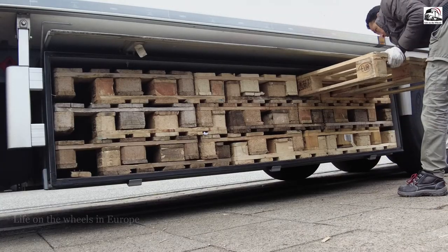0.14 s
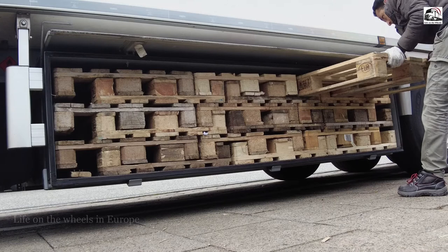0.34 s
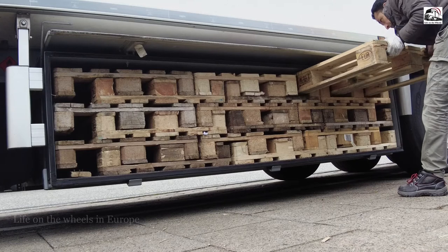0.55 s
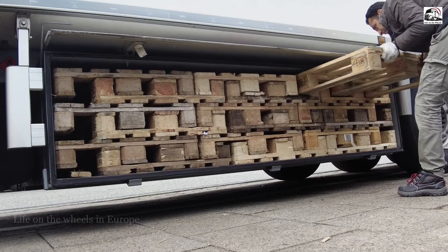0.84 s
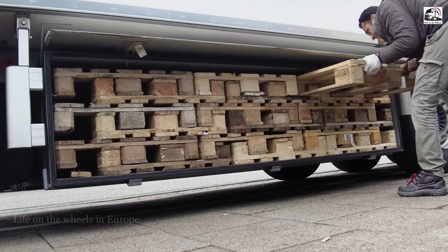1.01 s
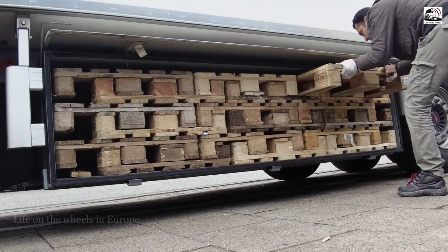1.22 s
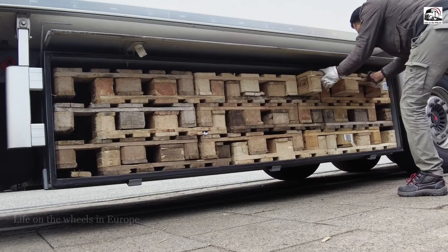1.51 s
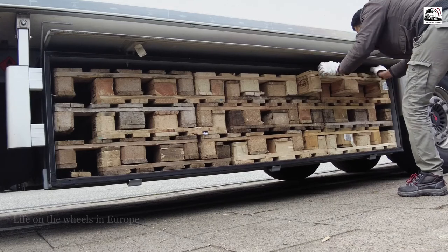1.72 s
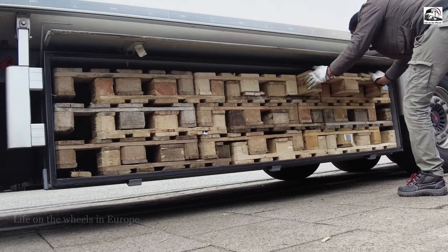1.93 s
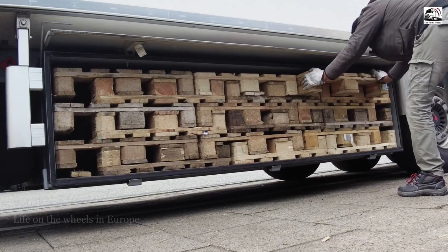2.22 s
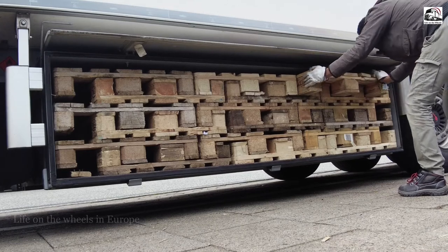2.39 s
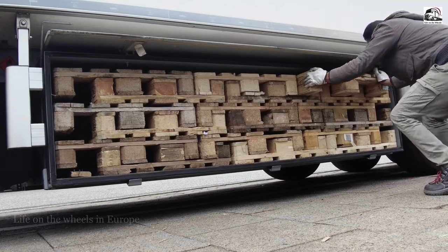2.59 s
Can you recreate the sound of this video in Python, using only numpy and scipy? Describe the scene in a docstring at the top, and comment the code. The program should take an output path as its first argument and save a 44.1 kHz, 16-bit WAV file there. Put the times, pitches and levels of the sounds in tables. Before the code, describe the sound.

Wooden pallet clattering and sliding onto a stack inside a steel box under a truck trailer.

```python
"""A low outdoor rumble and a faint rustle, then wood knocks: a pallet is being shoved into the steel
storage box under a truck trailer, heard from one microphone in the open air by the box.
The pallet knocks against the stack, drops onto it, scrapes inwards and hits the back. Its boards ring
at each blow and catch as they slide; its weight sets the steel panels booming and leaves a wall humming.
Afterwards gloves and clothes rustle and small bits tick."""
import sys
import numpy as np
from scipy import signal
from scipy.io import wavfile

SR = 44100
rng = np.random.default_rng(int(sys.argv[2]) if len(sys.argv) > 2 else 0)


def wrap_up_sound(samples):
    """Save the sound to the file named by the first command line argument, as 16-bit audio."""
    columns = np.atleast_2d(samples).T
    # keep every value between -1 and 1, then stretch to whole-number steps
    tamed = np.clip(columns, -1, 1)
    steps = np.round(tamed * 32767).astype(np.int16)
    wavfile.write(sys.argv[1], SR, steps)


N = 121275
TIME = np.arange(N) / SR
RING_TIME = TIME[:SR // 2]


def from_db(db):
    """Decibels to gain."""
    return 10 ** (np.asarray(db) / 20)


def rms_one(x):
    """Scale to rms 1."""
    return x / np.sqrt(np.mean(x ** 2) + 1e-20)


def at_hz(points, hz):
    """Read a table on a log-frequency axis."""
    frequencies, values = np.transpose(points)
    return np.interp(np.log(hz), np.log(frequencies), values)


def level(curve):
    """Gain over time from (time [s], level [dB]) points."""
    return from_db(np.interp(TIME, *np.transpose(curve)))


def cut(x, hz, kind, order=2):
    """Butterworth filter."""
    return signal.sosfilt(signal.butter(order, np.clip(hz, 10, .45 * SR), kind, fs=SR, output="sos"), x)


def dying(t, t60):
    """Exponential decay, 60 dB down after t60 seconds."""
    return np.exp(-np.log(1000) * t / t60)


def ring(hz, t60, t=RING_TIME):
    """One struck mode: a decaying sine."""
    return np.sin(2 * np.pi * hz * t) * dying(t, t60)


def ring_together(modes, t=RING_TIME):
    """The sum of a body's modes, all struck at once."""
    return sum(from_db(db) * ring(hz, t60, t) for hz, db, t60 in modes)


def add(out, start_s, sound):
    """Mix a sound in at its start time."""
    i = max(int(start_s * SR), 0)
    out[i:i + len(sound)] += sound[:max(N - i, 0)]


def bands(sources, spectrum):
    """Half-octave (centre [Hz], signal) pairs from two white sources in turn, keeping their power."""
    edges = 18 * 2 ** np.arange(0, 10.1, .5)
    centres = np.sqrt(edges[1:] * edges[:-1])
    gains = from_db(at_hz(spectrum, centres))
    gains /= np.sqrt(np.sum(gains ** 2 * np.diff(edges)) * 2 / SR)
    return [(hz, gains[k] * cut(sources[k % 2], edges[k:k + 2], "band")) for k, hz in enumerate(centres)]


def noise(spectrum):
    """Coloured noise, rms 1."""
    return rms_one(sum(band for _, band in bands(rng.standard_normal((2, N)), spectrum)))


# open air around the microphone: (frequency [Hz], relative level [dB])
AIR_COLOUR = [(20, 3), (35, 6.5), (62, -3), (90, -9), (150, -25), (300, -30), (700, -34.5), (1600, -42),
              (3000, -54), (6000, -62.5), (10000, -70.5), (15000, -73)]

def outdoor_rumble(level_db=-29):
    """The steady low background of the place."""
    return from_db(level_db) * noise(AIR_COLOUR)


# the worker's movements at the box: (time [s], length [s], level [dB])
CLOTH_RUBS = [(0, 0.3, -57.5), (0.761, 0.068, -44), (1.163, 0.077, -45), (2.069, 0.21, -46),
              (2.403, 0.3, -50.5), (2.61, 0.18, -49.5)]
# rubbing fabric: (frequency [Hz], relative level [dB])
CLOTH_COLOUR = [(300, 9.5), (1000, 8), (3000, 2.5), (4200, -3.5), (6000, -5), (8500, -19.5), (15000, -18)]

def rustle():
    """Gloves and clothes rub in soft swells of noise."""
    swells = np.zeros(N)
    for start_s, length_s, db in CLOTH_RUBS:
        add(swells, start_s, from_db(db) * np.hanning(int(length_s * SR)))
    return swells * noise(CLOTH_COLOUR)


def grip(spread_db=2.0, step_s=.02):
    """Uneven grip of sliding wood: a gain that glides between random values."""
    moments = np.arange(0, N / SR + step_s, step_s)
    return np.interp(TIME, moments, from_db(spread_db * rng.standard_normal(len(moments))))


# friction of the pallet on its way into the box: (time [s], level [dB])
FRICTION = [(0, -51), (.25, -57.5), (.37, -36.5), (.46, -62), (.76, -69), (.83, -35), (.93, -38),
            (1.1, -41), (1.26, -32.5), (1.42, -37), (1.5, -37.5), (1.61, -28.5), (1.69, -38), (1.73, -39.5),
            (1.765, -64), (2.0, -80)]
# wood dragged over wood: (frequency [Hz], relative level [dB])
SCRAPE_COLOUR = [(100, 1.5), (230, 3), (450, 4), (800, 1), (1500, -9), (2800, -17.5), (4000, -29),
                 (10000, -51)]

def scrape(slips_per_s=1600, spread_db=1.5):
    """Rough boards catch and slip many times a second, each slip a tiny click in the wood."""
    sizes = from_db(spread_db * np.minimum(rng.exponential(1, (2, N)), 4))
    signs = rng.choice([-1, 1], (2, N))
    slips = sizes * signs * (rng.random((2, N)) < slips_per_s / SR)
    grinding = sum(band * grip() for _, band in bands(slips + 1e-18, SCRAPE_COLOUR))
    return level(FRICTION) * rms_one(grinding)


# the boards, rung by catches and knocks: (frequency [Hz], relative level [dB], t60 [s])
BOARD_MODES = [(227, 1, 0.26), (354.3, 0, 0.11), (397, -3.5, 0.078), (580, 1, 0.06), (682.3, 0.5, 0.08),
               (788, -7.5, 0.094), (889, -4, 0.042), (1051, -2.5, 0.065), (1204, -2.5, 0.051),
               (1357, -3, 0.053), (1670, -5, 0.042), (1968, -12, 0.049), (2415, -3, 0.04),
               (2790, -2, 0.054)]

def catches(per_s=110, spread_db=3.5, ring_time_share=.46, against_friction_db=-3.5):
    """Rough spots snag at random; each briefly rings the loaded boards with a new mix of modes."""
    out = np.zeros(N)
    starts = np.flatnonzero(rng.random(N) < per_s / SR)
    sizes = from_db(spread_db * np.minimum(rng.exponential(1, len(starts)), 3))
    modes = np.array([from_db(db) * ring(hz, t60 * ring_time_share) for hz, db, t60 in BOARD_MODES])
    for start, size in zip(starts, sizes):
        mix = rng.standard_normal(len(modes))
        add(out, start / SR, size * (mix @ modes))
    return from_db(against_friction_db) * level(FRICTION) * rms_one(cut(out, 1500, "low", order=1))


# the box shaking under the trailer: (time [s], level [dB])
SHUDDER_LEVEL = [(0, -42.5), (.18, -38.5), (.26, -23), (.45, -26.5), (.6, -26.5), (.74, -25), (.8, -31),
                 (.9, -13), (1.1, -21), (1.3, -16.5), (1.53, -25.5), (1.72, -19.5), (1.84, -23.5),
                 (1.96, -33), (2.3, -47.5), (2.75, -38.5)]
# its deep rumble: (frequency [Hz], relative level [dB])
SHUDDER_SPECTRUM = [(20, 0), (32, 3.5), (60, 1.5), (90, -2.5), (120, -6.5), (170, -11.5), (230, -13.5),
                    (400, -31), (800, -70), (3000, -80), (12000, -95)]

def box_shudder():
    """The moving load keeps the steel panels shuddering."""
    return level(SHUDDER_LEVEL) * noise(SHUDDER_SPECTRUM)


# small bits ticking at the box: (time [s], level [dB], t60 [s])
DRY_TICKS = [(0.08, -52, 0.081), (0.437, -53, 0.05), (0.554, -47.5, 0.13), (1.724, -42, 0.047),
             (1.813, -42.5, 0.011), (2.04, -46, .05), (2.385, -38, 0.066), (2.537, -39, .1),
             (2.555, -39, .04), (2.609, -40.5, 0.058), (2.622, -41.5, 0.053), (2.72, -37, 0.047),
             (2.737, -45, 0.06)]
# their dry tone: (frequency [Hz], relative level [dB])
TICK_SPECTRUM = [(300, 7), (1200, 4.5), (2800, 3.5), (4200, -5), (6000, -2.5), (9000, -14), (15000, -12)]

def ticks():
    """Small bits tick, each a sudden burst of noise that dies fast."""
    bursts = np.zeros(N)
    for start_s, db, t60 in DRY_TICKS:
        add(bursts, start_s, from_db(db) * dying(RING_TIME, t60))
    return bursts * noise(TICK_SPECTRUM)


# dense ring of the whole pallet: (frequency [Hz], relative level [dB])
PALLET_COLOUR = [(100, 9), (250, 13), (700, 4.5), (1300, 0.5), (2000, 0), (2800, -5), (3700, -6.5),
                 (7000, -11.5), (15000, -36)]
# its decay in the wood: (frequency [Hz], t60 [s])
PALLET_DECAY = [(150, 0.16), (700, 0.068), (2500, 0.058), (10000, 0.065)]
# its tail inside the box: (frequency [Hz], t60 [s])
BOX_DECAY = [(150, 1), (700, 0.32), (2500, 0.14), (10000, .1)]
# wood striking wood: (time [s], level [dB], contact brightness [Hz], low cut [Hz],
# crack level [dB], crack t60 [s], block pitch [Hz], block level [dB])
BLOWS = [(.196, -31.5, 1740, 453, -38, 0.021, 1240, -22.5), (.284, -34, 880, 390, -72, .03, 900, -30),
         (.301, -32.5, 695, 300, -69, .03, 547, -34), (.316, -32, 1070, 170, -57, 0.037, 1090, -38),
         (.339, -26, 2730, 1010, -50.5, .04, 1460, -18), (.347, -28, 2480, 250, -53, 0.063, 2000, -39),
         (.5855, -21, 1120, 350, -36.5, 0.022, 980, -13), (.623, -43.5, 2520, 500, -62, .03, 1100, -42),
         (.659, -30, 590, 246, -60, .03, 550, -32), (.744, -45, 3040, 695, -52, .02, 2600, -44),
         (.810, -26, 1500, 500, -56, .02, 1360, -20), (.8255, -20.5, 1390, 298, -56, .02, 990, -20),
         (.843, -21.5, 1520, 402, -46, .04, 1210, -25), (.8615, -13, 2800, 870, -35, .035, 1860, -5),
         (.867, -23, 2600, 794, -39, 0.045, 970, -10), (.874, -14, 2330, 580, -38, 0.033, 1310, -8.5),
         (.885, -17.5, 1680, 300, -48, .03, 410, -21), (.897, -29.5, 2190, 400, -61, .03, 700, -24),
         (.925, -25, 885, 200, -66, .03, 480, -20), (.980, -16, 1720, 249, -39, 0.029, 2870, -14),
         (.982, -26.5, 900, 300, -52, .02, 935, -6.5), (.987, -23.5, 1200, 200, -49, .025, 600, -19),
         (1.147, -19.5, 890, 430, -46.5, 0.058, 740, -9.5), (1.226, -19.5, 1280, 350, -46.5, .05, 700, -18),
         (1.231, -30.5, 1990, 402, -49, .04, 1130, -22), (1.243, -25, 1000, 353, -52, .03, 840, -25),
         (1.368, -22.5, 1370, 454, -43.5, .03, 700, -11), (1.376, -30, 1800, 400, -48, 0.043, 810, -28),
         (1.541, -37, 1000, 300, -58, .03, 600, -32), (1.562, -37, 2000, 400, -46, .04, 1000, -34),
         (1.601, -20.5, 1300, 297, -38.5, .06, 483, -18), (1.634, -21.5, 1490, 352, -44, .05, 473, -13.5),
         (1.638, -28, 1780, 404, -50, .03, 1840, -11), (1.642, -25.5, 1210, 298, -50, .03, 1060, -18),
         (1.655, -24.5, 653, 200, -69, .03, 620, -17.5), (2.042, -39, 2000, 1010, -62, 0.033, 1140, -34)]

def knocks(dense_db=.5, tail_db=-23, boards_db=-10.5, strike_spread_db=3.5, block_t60_cycles=15):
    """Each blow rings the struck block, boards and whole pallet, with a crack and a tail in the box."""
    t, out = RING_TIME, np.zeros(N)
    modes = np.array([(-1) ** k * from_db(db) * ring(hz, t60)
                      for k, (hz, db, t60) in enumerate(BOARD_MODES)])
    for start_s, db, contact_hz, low_hz, crack_db, crack_t60, block_hz, block_db in BLOWS:
        dense = np.zeros(len(t))
        for hz, band in bands(rng.standard_normal((2, len(t))), PALLET_COLOUR):
            box_tail = from_db(tail_db) * dying(t, at_hz(BOX_DECAY, hz))
            dense += band * (dying(t, at_hz(PALLET_DECAY, hz)) + box_tail)
        boards = from_db(boards_db + strike_spread_db * rng.standard_normal(len(modes))) @ modes
        wood = cut(from_db(dense_db) * dense + boards, contact_hz, "low")
        wood = cut(wood, low_hz, "high")
        wood /= np.sqrt(np.mean(wood[:SR // 125] ** 2))  # rms 1 over the first 8 ms
        treble = cut(rng.standard_normal(len(t)), 2850, "high")
        crack = rms_one(cut(treble, 5500, "low", order=1)) * dying(t, crack_t60)
        block = cut(ring(block_hz, block_t60_cycles / block_hz), 2 * block_hz, "low")
        add(out, start_s, from_db(db) * wood + from_db(crack_db) * crack + from_db(block_db) * block)
    return out


# the fuller blows: (time [s], level [dB])
DECK_FLEXES = [(.196, -33), (0.5856, -24.5), (0.658, -27.5), (.826, -24.5), (.878, -16), (.91, -20),
               (.981, -16), (1.147, -25), (1.228, -26), (1.368, -26.5), (1.603, -23), (1.645, -26)]
# the pallet's deck: (frequency [Hz], relative level [dB], t60 [s])
DECK_MODES = [(199.6, 0, 0.16), (229, -3.5, 0.19), (259.6, -2.5, 0.17), (356, -6, 0.082), (448, -11, 0.13)]

def deck():
    """Full blows flex the whole deck, which answers with a hollow note."""
    out = np.zeros(N)
    note = cut(ring_together(DECK_MODES), 590, "low")
    for start_s, db in DECK_FLEXES:
        add(out, start_s, from_db(db) * note)
    return out


# weight landing on the box: (time [s], impulse level [dB], push length [s])
PUSHES = [(0.213, -15, 0.026), (0.259, -16, 0.021), (0.317, -22.5, 0.0052), (0.377, -28, 0.0072),
          (0.592, -26.5, 0.0061), (.655, -23.5, 0.008), (0.881, -9, 0.0093), (.906, -12.5, 0.007),
          (0.981, -18.5, 0.007), (1.147, -19, 0.0076), (1.2, -8, 0.018), (1.255, -30, 0.0063),
          (1.401, -17.5, 0.011), (1.608, -9, 0.0088), (1.64, -12.5, 0.0094), (1.679, -8.5, 0.0096),
          (2.434, -22, 0.014)]
# steel floor and walls: (frequency [Hz], relative level [dB], t60 [s])
PANEL_MODES = [(30.5, -5, 0.52), (42.5, 2.5, 0.31), (59.02, -2, 0.57), (87, -14, .25), (114.2, -5, 0.61),
               (155.4, -19, 0.69), (203.4, -3, 0.45)]

def box_boom():
    """Soft pushes set the steel panels booming; a longer push gives a duller boom."""
    force = np.zeros(N)
    for start_s, db, length_s in PUSHES:
        push = np.hanning(int(length_s * SR))
        add(force, start_s, from_db(db) * push / push.sum())
    return signal.fftconvolve(force, ring_together(PANEL_MODES, TIME[:SR]))[:N]


# fine hiss of the slide towards the back of the box: (time [s], level [dB])
HISS_LEVEL = [(.76, -70), (.785, -52.5), (.87, -53), (.91, -76), (.98, -61), (1.04, -56), (1.12, -57.5),
              (1.22, -51.5), (1.3, -56), (1.61, -49.5), (1.67, -56), (1.73, -53.5), (1.765, -85)]
# its bright tone: (frequency [Hz], relative level [dB])
HISS_SPECTRUM = [(500, -7), (1500, 0), (2800, 2), (4000, -1.5), (7000, -2), (9000, -15.5), (15000, -15)]

def splinter_hiss(tears_per_s=130, tear_size=1.2, tear_t60_s=.014):
    """Sliding wood hisses, flaring for milliseconds each time fibres tear."""
    tears = (rng.random(N) < tears_per_s / SR) * np.minimum(rng.exponential(1, N), 3)
    flares = signal.fftconvolve(tears, dying(RING_TIME, tear_t60_s))[:N]
    return level(HISS_LEVEL) * grip() * rms_one(1 + tear_size * flares) * noise(HISS_SPECTRUM)


# one steel wall of the box: (frequency [Hz], level [dB], t60 [s])
WALL_MODES = [(59.57, -6.5, 0.92), (116.8, -14.5, 1), (155.6, -28, .7)]

def wall_hum(start_s=1.628, rise_s=.15):
    """The last shove leaves one wall humming; the hum swells quickly and dies away."""
    t = np.maximum(TIME - start_s, 0)
    return (1 - dying(t, rise_s)) * ring_together(WALL_MODES, t)


def scene():
    """Outdoor rumble, worker, pallet and box at one microphone."""
    pallet = scrape() + catches() + knocks() + deck() + splinter_hiss()
    box = box_shudder() + box_boom() + wall_hum()
    return (outdoor_rumble() + rustle() + ticks() + pallet + box)[None]


def record(dry, low_hz=12, top_hz=15900):
    """The microphone chain loses the deepest bass, stops peaks at full scale and cuts the top."""
    clipped = np.clip(cut(dry, low_hz, "high", order=1), -1, 1)
    return signal.sosfilt(signal.ellip(10, .1, 90, top_hz, fs=SR, output="sos"), clipped)


dry = scene()
out = record(dry)
wrap_up_sound(out)
```